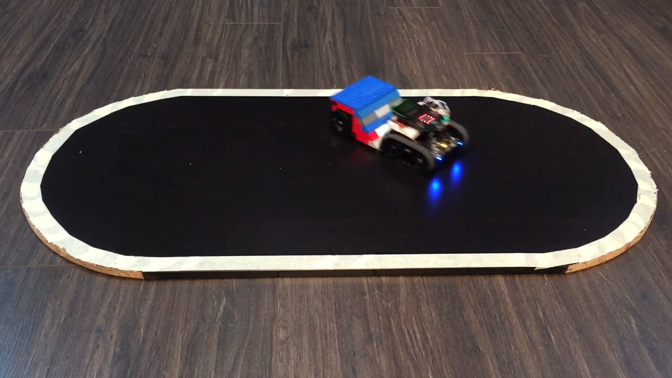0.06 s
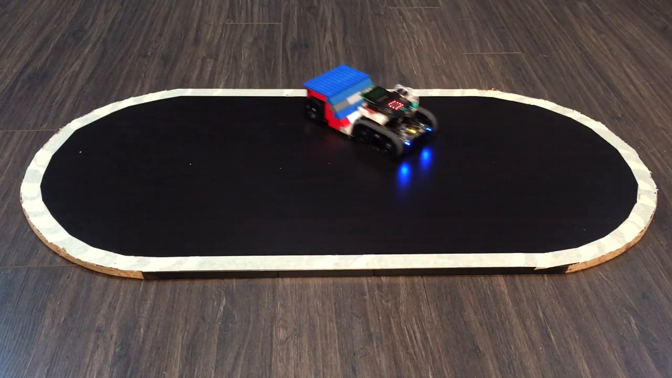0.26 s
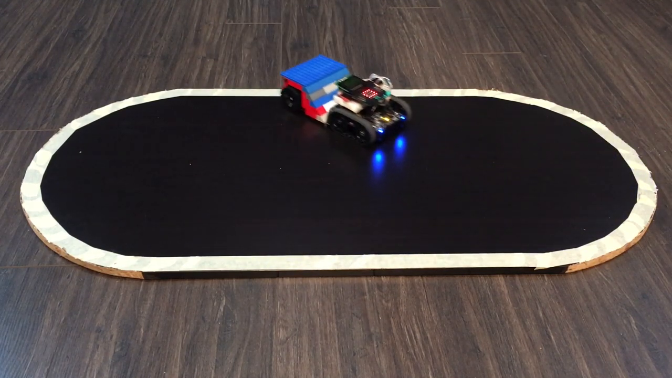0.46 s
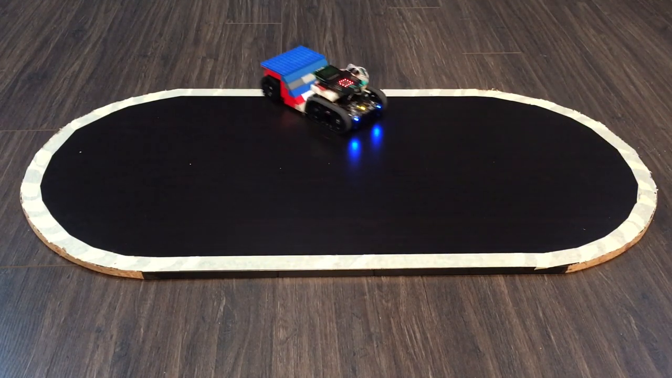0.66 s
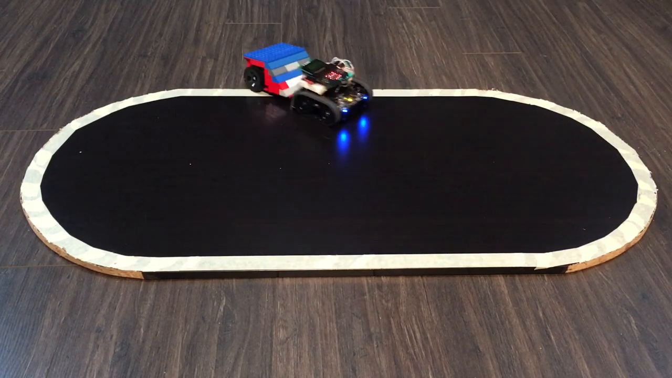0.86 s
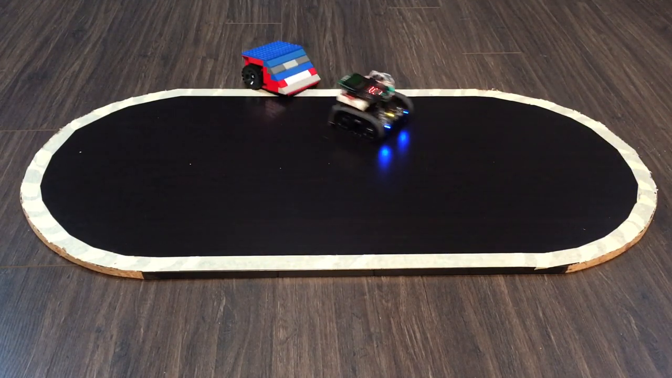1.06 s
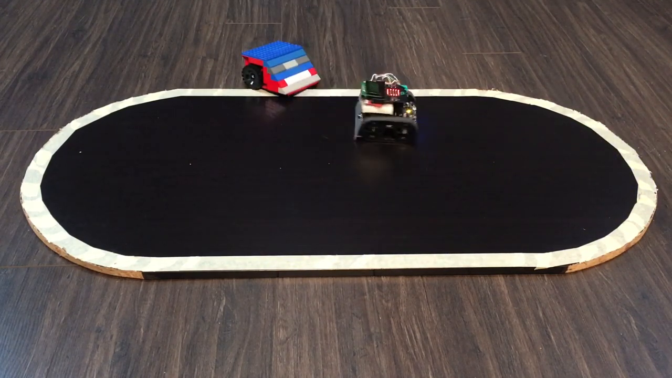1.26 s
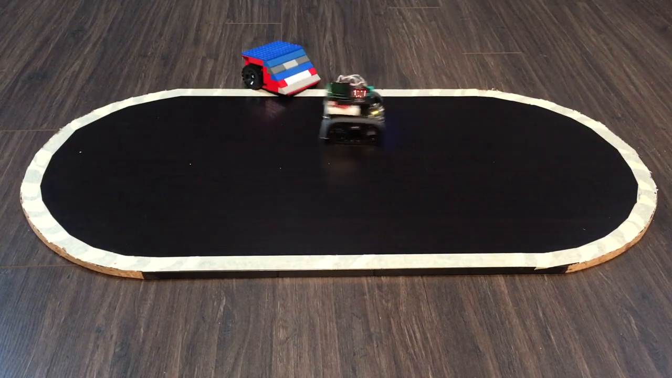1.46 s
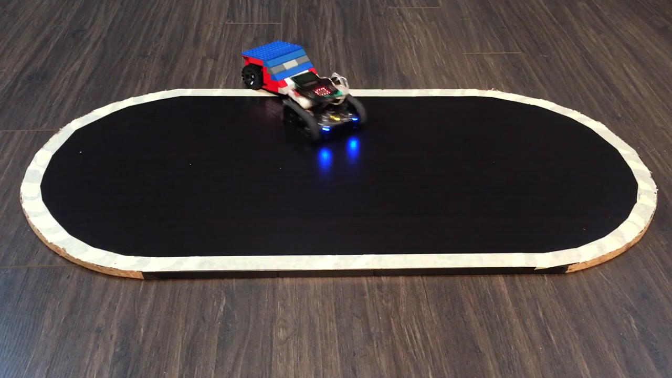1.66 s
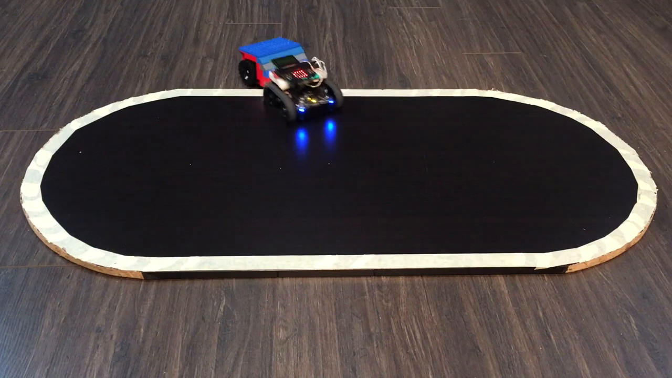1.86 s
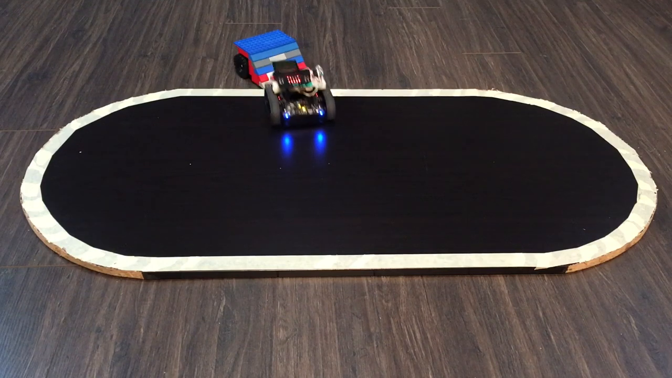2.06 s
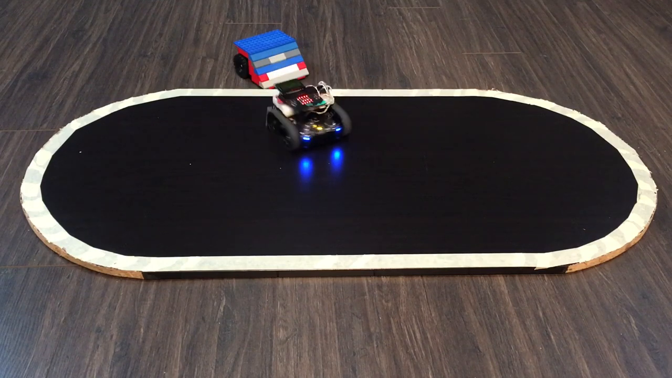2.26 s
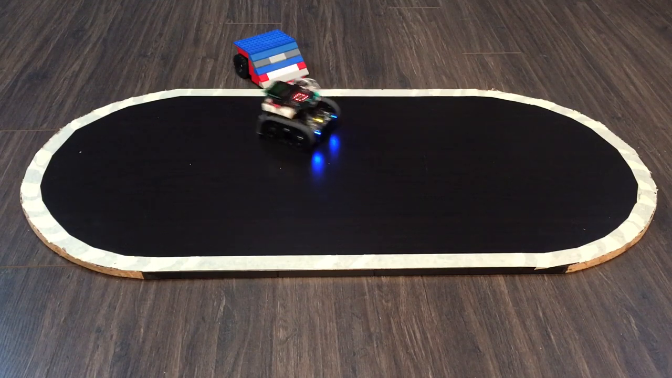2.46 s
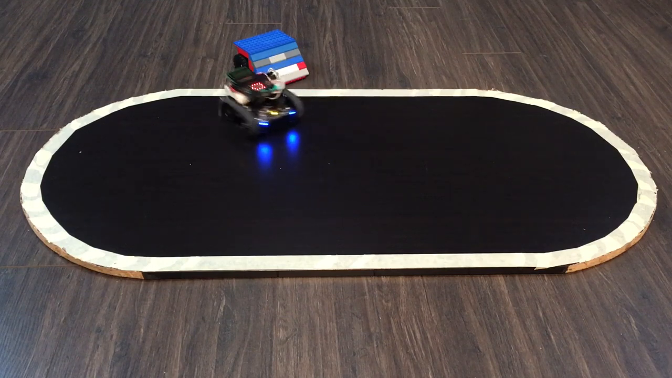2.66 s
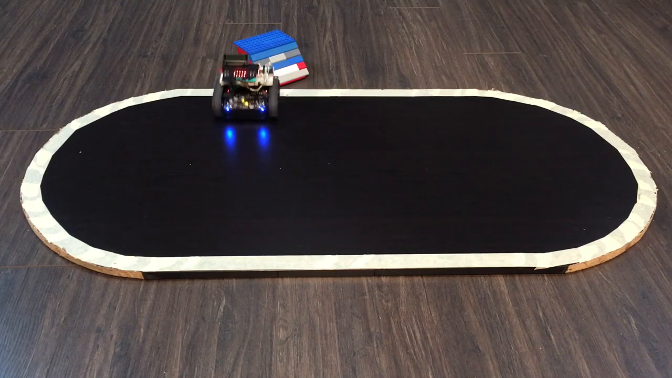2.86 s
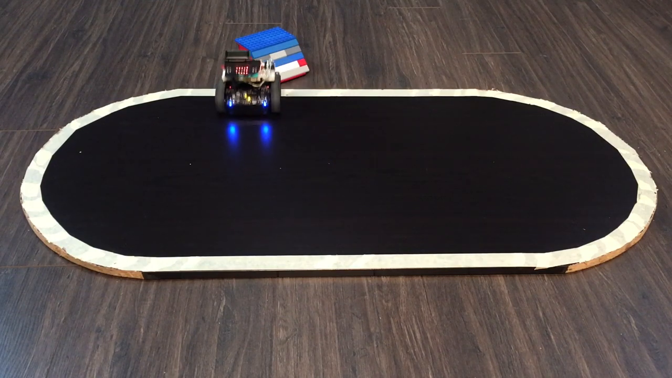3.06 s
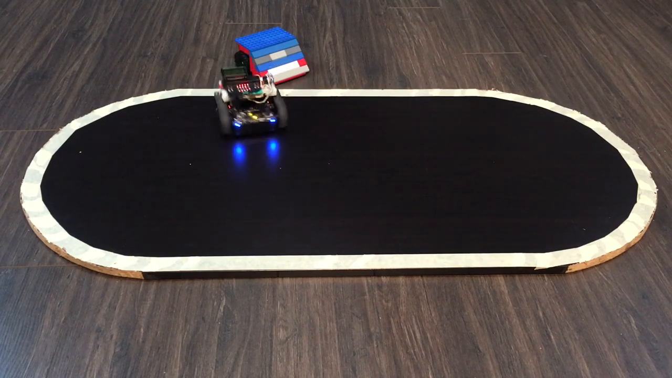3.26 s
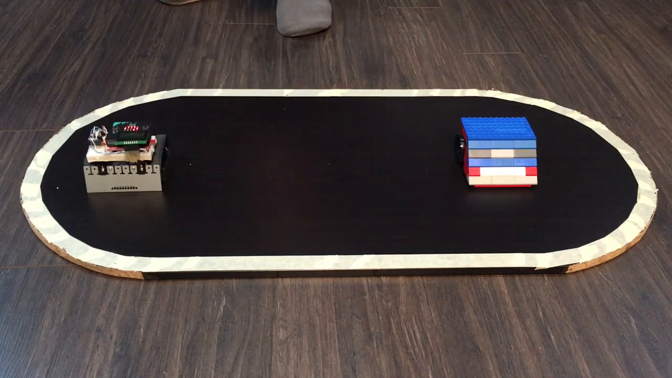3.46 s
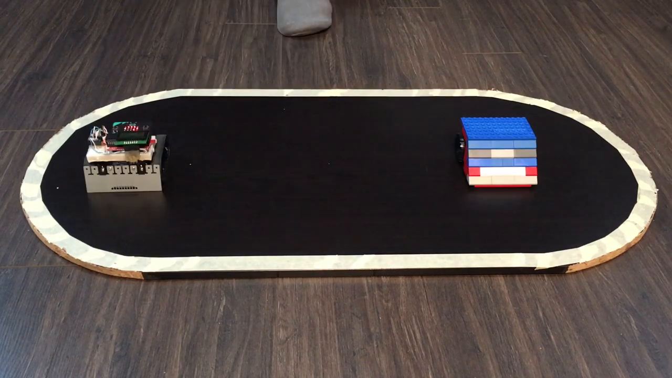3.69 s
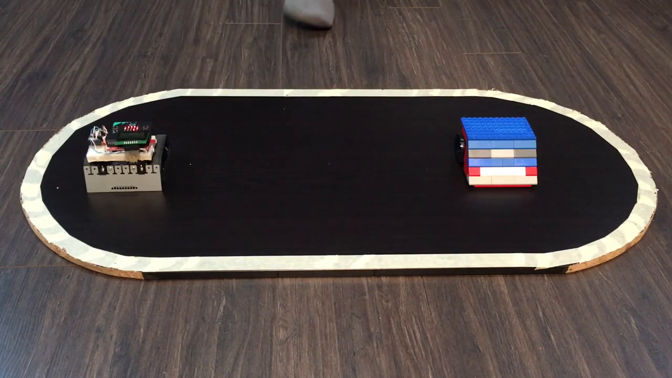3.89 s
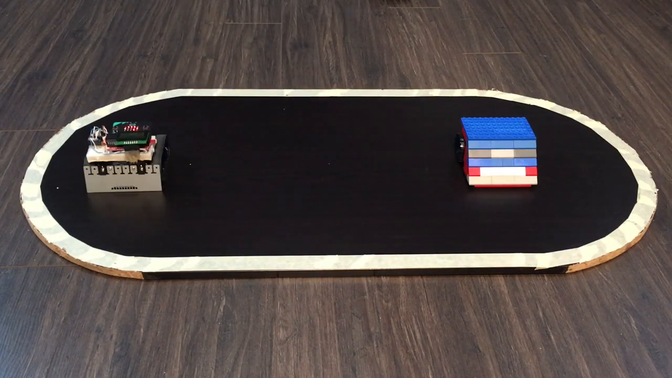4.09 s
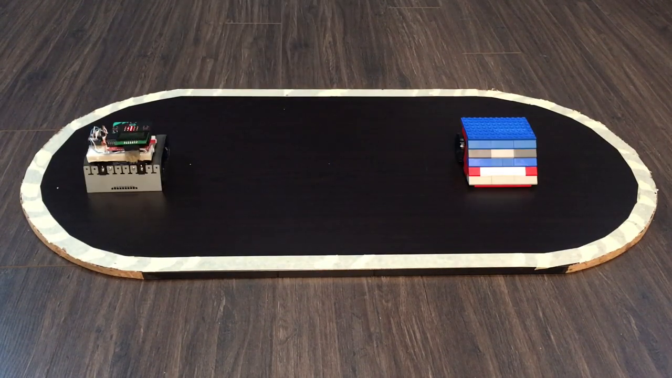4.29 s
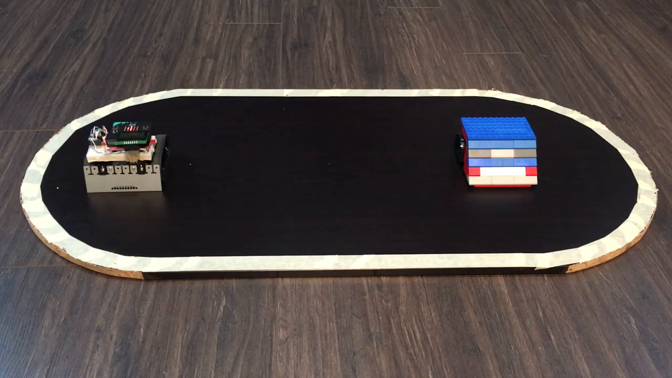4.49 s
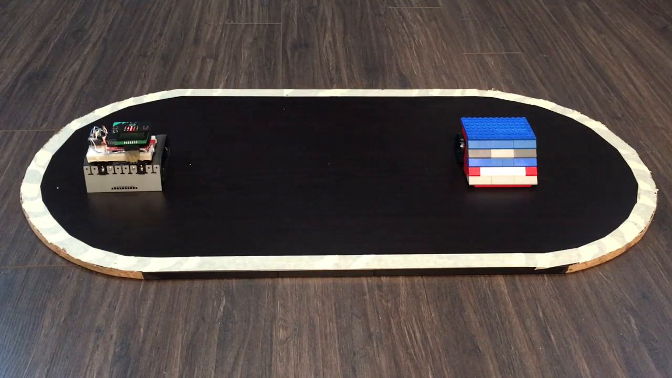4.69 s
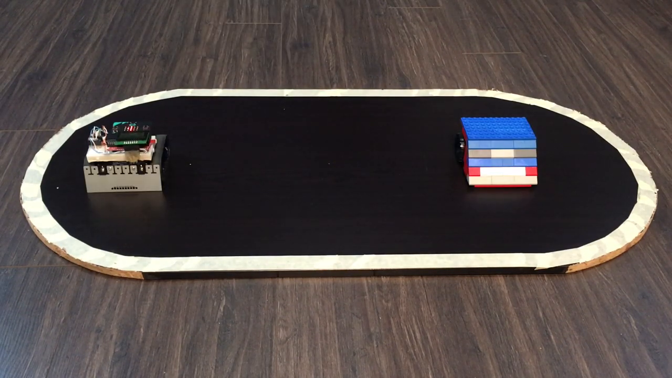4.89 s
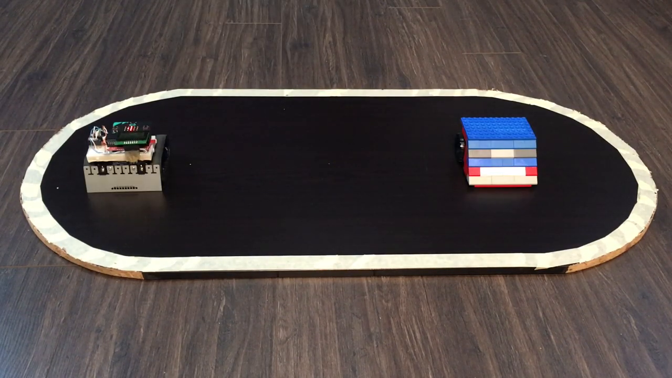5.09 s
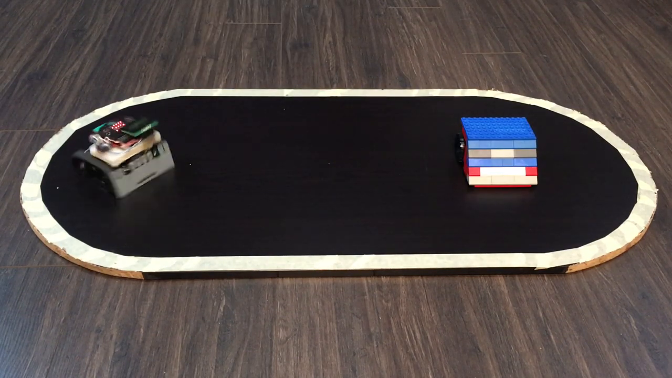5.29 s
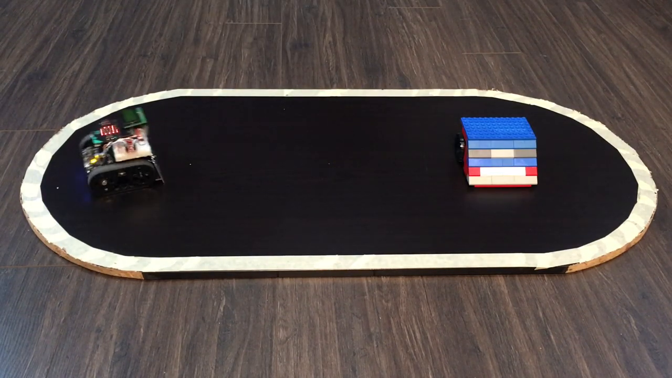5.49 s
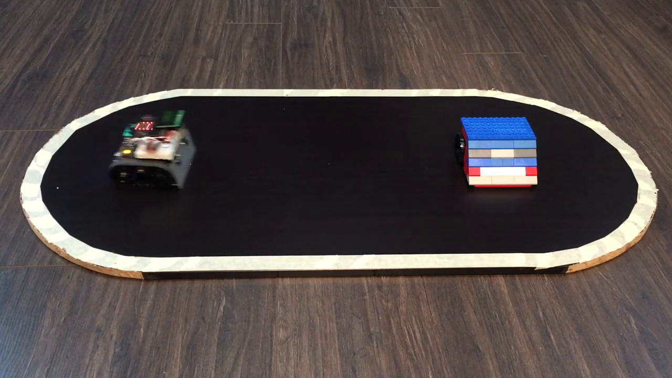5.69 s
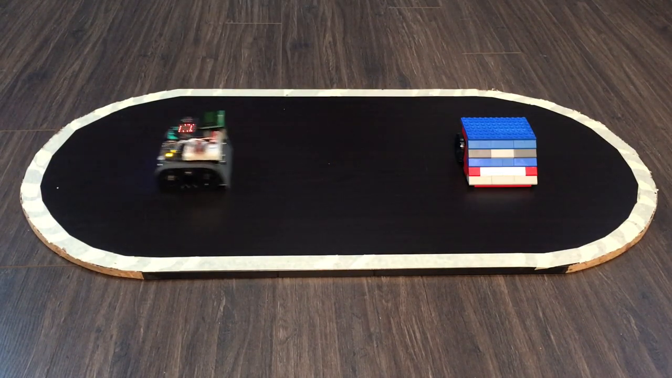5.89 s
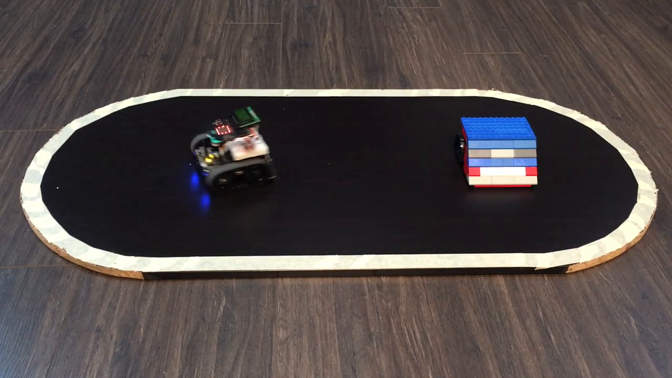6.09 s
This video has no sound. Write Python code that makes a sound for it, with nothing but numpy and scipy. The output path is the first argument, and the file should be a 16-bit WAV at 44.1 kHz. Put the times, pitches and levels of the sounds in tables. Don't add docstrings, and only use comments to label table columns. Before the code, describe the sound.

Raspy toy-motor whirring with dull thuds and sharp plastic clacks cuts abruptly to faint sock scuffs in a quiet room before the motors restart.

```python
import sys
import numpy as np
from scipy import signal
from scipy.fft import rfft, irfft, next_fast_len
from scipy.io import wavfile
from scipy.ndimage import uniform_filter1d

SR = 44100
rng = np.random.default_rng(int(sys.argv[2]) if len(sys.argv) > 2 else 0)


def elevation(decibels):
    levels = np.asarray(decibels, float)
    return 10 ** (levels / 20)


def to_wav(s):
    ch = np.atleast_2d(s).T
    pcm = np.round(np.clip(ch, -1, 1) * 32767)
    wavfile.write(sys.argv[1], SR, pcm.astype(np.int16))


N = 270774
T = np.arange(N) / SR
CHANGE_S = 3.331


def unit(x):
    return x / np.sqrt(np.mean(x ** 2))


def walk(rate_hz):
    hold = int(SR / rate_hz)
    steps = np.repeat(rng.standard_normal(N // hold + 1), hold)
    return unit(uniform_filter1d(uniform_filter1d(steps, hold), hold)[:N])


def colour(x, points):
    hz, db = np.transpose(points)
    size = next_fast_len(N, True)
    bins = np.log(np.fft.rfftfreq(size, 1 / SR) + 1)
    skirt = np.maximum(np.log(hz[0]) - bins, 0) + np.maximum(bins - np.log(hz[-1]), 0)
    gain = elevation(np.interp(bins, np.log(hz), db) - 60 * skirt)
    return unit(irfft(rfft(x, size) * gain, size)[:N])


def patchy(x, depth_db):
    z = signal.stft(x, nperseg=512)[2]
    field = uniform_filter1d(rng.standard_normal(z.shape), size=4, axis=0)
    field = uniform_filter1d(field, size=9, axis=1)
    return unit(signal.istft(z * elevation(depth_db * unit(field)), nperseg=512)[1][:N])


def resonate(x, peaks):
    return sum(elevation(db) * signal.lfilter(*signal.iirpeak(hz, hz / width, SR), x) for hz, width, db in peaks)


def grit(rate_hz, scatter_db):
    hits = rng.random(N) < rate_hz / SR
    return unit(hits * rng.standard_normal(N) * elevation(scatter_db * rng.standard_normal(N)))


def swells(rows):
    power = 0
    for s, db, rise_s, fall_s in rows:
        power = power + elevation(db - 20 * np.maximum((s - T) / rise_s, (T - s) / fall_s)) ** 2
    return np.sqrt(power)


def obey(orders):
    s, goal_hz, lag_s, *levels = np.transpose(orders)
    start_hz = [goal_hz[0]]
    for k in range(len(s) - 1):
        left = np.exp(-(s[k + 1] - s[k]) / lag_s[k])
        start_hz.append(goal_hz[k] + (start_hz[k] - goal_hz[k]) * left)
    now = np.maximum(np.searchsorted(s, T, "right") - 1, 0)
    hz = goal_hz[now] + (np.array(start_hz) - goal_hz)[now] * np.exp(-(T - s[now]) / lag_s[now])
    keep = np.exp(-1 / (0.007 * SR))
    settled = []
    for db in levels:
        change = signal.lfilter([1 - keep], [1, -keep], elevation(db[now]) - elevation(db[0]))
        settled.append(20 * np.log10(elevation(db[0]) + change + 1e-9))
    return hz, *settled


# multiple, level_db
OVERTONES = [(2, 1.5), (3, 3.5), (4, 2.5), (5, -2.5), (6, -11)]
# pitch_hz, width_hz, level_db
FRAME_MODES = [(2120, 130, -20), (2350, 240, -7), (2650, 200, -3.5), (3050, 116, -5.5), (3420, 180, -1.5),
               (3700, 220, -0.5), (3880, 210, -15.5), (4190, 220, 4.5)]


def whine(orders):
    waver, slip, throb_db = .003, .009, 3.7
    hz, first_db, upper_db = obey(orders)
    throb = walk(300) + 0.26 * walk(35)
    overtones, mesh = 0, 0
    # level_db, drift
    for share_db, drift in (0, 0), (-9, .014):
        speed_hz = hz * (1 + drift * walk(8) + waver * walk(60) + slip * walk(700))
        phase = 2 * np.pi * np.cumsum(speed_hz) / SR
        skirt = .35 * walk(1200) + elevation(-6.5) * walk(3500)
        force = elevation(throb_db * walk(250)) + skirt
        mesh = mesh + elevation(share_db + first_db) * force * np.sin(phase + .5 * walk(400))
        voice = 0
        for k, db in OVERTONES:
            k = round(k)
            case_db = np.maximum(1.4 * np.interp(k * hz, *np.transpose(HISS_COLOUR)), -4)
            level_db = upper_db + db + case_db + throb_db * np.roll(throb, k * SR // 7)
            voice += elevation(level_db) * np.sin(k * phase) * (k * hz < 15600)
        overtones = overtones + elevation(share_db) * voice
    return overtones + elevation(-9.5) * mesh + resonate(mesh, FRAME_MODES)


# start_s, mesh_hz, lag_s, first_partial_db, overtones_db
LEFT_PUSH = [(0, 2365, .05, -51, -55.5), (.12, 2445, .07, -49, -55.5), (.25, 2380, 0.028, -48.5, -54.5),
             (.316, 2130, 0.034, -52.5, -56.5), (.5, 2185, 0.049, -56, -55.5), (.6, 2020, 0.048, -57, -58),
             (.76, 2080, 0.038, -57, -59.5), (.835, 2610, 0.01, -88, -82), (.871, 3400, .1, -51, -66),
             (.911, 3880, .06, -53.5, -60), (.96, 3860, 0.055, -50.5, -66.5),
             (1.065, 1750, 0.024, -90, -70), (1.14, 2500, .13, -65, -62), (1.25, 2100, .02, -93, -80),
             (1.28, 3300, 0.081, -67, -56), (1.36, 2980, 0.027, -47, -57), (1.392, 4190, .047, -48.5, -54),
             (1.535, 2550, .12, -95, -93.5), (1.965, 4600, .17, -51, -64), (2.05, 4050, 0.073, -48, -59),
             (2.135, 1830, .03, -85, -80), (2.25, 15000, 2.7, -70, -78), (2.34, 6000, 0.53, -53, -59),
             (2.42, 6000, .5, -55, -52), (2.49, 3400, .025, -56, -62), (2.545, 4300, .035, -46.5, -56),
             (2.6, 4125, .02, -49.5, -53.5), (2.665, 4120, 0.041, -60, -70), (2.725, 2300, .3, -130, -130)]
# start_s, mesh_hz, lag_s, first_partial_db, overtones_db
LEFT_SPIN = [(5.172, 3960, .055, -56, -72), (5.215, 3993, .058, -42.5, -57.5),
             (5.43, 3736, 0.056, -59, -90), (5.462, 1950, .006, -110, -110),
             (5.483, 3285, 0.056, -61, -55.5), (5.551, 3026, .018, -58, -56), (5.636, 2690, .05, -90, -95),
             (5.8, 3180, .04, -62, -68), (5.88, 3180, .05, -64, -62), (5.925, 2850, .02, -90, -90),
             (6.0, 3390, .06, -56, -61), (6.035, 3185, .012, -46, -52.5), (6.06, 2920, .08, -53.5, -58),
             (6.11, 2374, 0.046, -60, -61)]
# start_s, mesh_hz, lag_s, first_partial_db, overtones_db
RIGHT = [(0, 2080, .05, -100, -100), (.64, 2150, 0.026, -58, -66), (.72, 2400, .1, -100, -100),
         (1.04, 2720, 0.022, -54.5, -77.5), (1.165, 2510, .035, -51.5, -66),
         (1.26, 2720, 0.039, -51.5, -65), (1.365, 2360, .015, -56, -73), (1.43, 4200, .02, -100, -100),
         (1.535, 2890, 0.074, -49.5, -62), (1.6, 3114, .02, -53, -55), (1.66, 2980, 0.035, -50.5, -53),
         (1.705, 3996, 0.12, -51, -55), (1.79, 2900, 0.14, -91.5, -90), (2.185, 2100, 0.16, -52, -62),
         (2.235, 2107, 0.16, -51, -65), (2.355, 2610, 0.043, -49.5, -64), (2.46, 3500, .096, -89.5, -92),
         (2.675, 2985, 0.031, -52.5, -56), (2.735, 3050, 0.042, -50, -57), (2.89, 3300, 0.067, -51, -52),
         (2.93, 2960, 0.079, -89, -73), (3.212, 2610, 0.029, -56.5, -69), (3.325, 3120, 0.22, -130, -130),
         (5.625, 2370, 0.021, -63, -61), (5.685, 2663, .04, -50.5, -59.5), (5.74, 2664, 0.041, -55, -57.5),
         (5.85, 2500, 0.0543, -63, -75), (5.89, 2660, .03, -55, -57.5), (6.03, 2580, 0.043, -70, -74)]


def motors():
    return whine(LEFT_PUSH + LEFT_SPIN) + whine(RIGHT)


# start_s, hiss_level_db
EFFORT = [
    [(0, -43.5), (.8, -44), (1.04, -42), (1.13, -46), (1.37, -40.5), (1.78, -41), (1.81, -39),
     (2.12, -44.5), (2.2, -47), (2.4, -42), (2.66, -41), (2.9, -42.5), (3.21, -44.5), (3.318, -50.5)],
    [(5.175, -49.5), (5.23, -42), (5.55, -43.5), (6.14, -45.5)],
]
# start_s, hiss_lost_db, braking_s
REVERSALS = [(.84, 11, 0.017), (1.11, 9, 0.063), (1.93, 6.5, 0.02), (2.02, -0.5, 0.049), (2.18, 5, 0.045),
             (2.679, 5, .022), (2.95, 4, .03), (2.37, 5, 0.027), (3.2, 10, 0.044), (5.461, 6, 0.054),
             (5.865, 6, 0.02), (6.054, 3, 0.059)]


def drive_effort():
    s, level_db = np.transpose(np.vstack(EFFORT))
    effort_db = np.interp(T, s, level_db)
    gate = 0
    for rows in EFFORT:
        inside_s = np.minimum(T - rows[0][0], rows[-1][0] - T)
        gate = gate + np.clip(inside_s / 0.011 + 1, 0, 1)
    for s, lost_db, brake_s in REVERSALS:
        away = np.maximum((s - T) / brake_s, (T - s) / 0.014)
        effort_db = effort_db - lost_db * np.clip(2 - 2 * away, 0, 1)
    return effort_db, np.minimum(gate, 1)


# pitch_hz, level_db per Hz
HISS_COLOUR = [(2530, -26), (4300, -2), (4880, -11), (6050, -0.5), (7660, -1.5), (9390, 0.5), (10000, 1.5),
               (10400, -4.5), (11000, 4), (12200, 2.5), (15500, -1), (16200, -19)]


def gear_hiss(effort_db):
    teeth = .6 * grit(9000, 1.5)
    return patchy(colour(rng.standard_normal(N) + teeth, HISS_COLOUR), 2.7) * elevation(effort_db - 4.0)


# pitch_hz, level_db per Hz
RATTLE_COLOUR = [(530, -52.5), (900, -8), (1180, -11), (1420, -6), (1530, -4.5), (2480, -1.5), (3160, -4.5),
                 (3760, 3), (4300, -3), (4830, -8), (5200, -4.5), (6760, -4.5), (11400, -120)]
# peak_s, level_db, rise_s, fall_s
JOLTS = [(.88, -62, .05, .5), (1.044, -49, 0.52, 0.15), (1.378, -57, 0.029, 0.81), (1.8, -52, 0.12, .2),
         (1.93, -69, 0.042, .15), (2.03, -61, 0.086, 0.27), (2.118, -45.5, 0.19, 0.11),
         (2.65, -52, 0.5, 0.09), (2.9, -54, 0.08, 0.59), (3.068, -41, 0.045, 0.073), (3.13, -55, 0.29, .1),
         (5.21, -58.5, 0.029, 0.39), (5.39, -56, 0.17, 0.18), (5.88, -55.5, .2, 0.54)]


def chassis_rattle(effort_db):
    at_rest = elevation(-61 + 0.2 * (effort_db - effort_db[0]))
    parts = .6 * grit(4000, 1.5)
    rattle = patchy(colour(rng.standard_normal(N) + parts, RATTLE_COLOUR), 2.77)
    return rattle * np.hypot(at_rest, swells(JOLTS)) * elevation(4.5)


# pitch_hz, level_db per Hz
SLIDE_COLOUR = [(59, -45), (100, -14.5), (130, -8), (172, -16), (221, -4.5), (290, -0.5), (350, 5),
                (387, -1), (508, -8), (573, -15), (646, -13), (1100, -26), (1430, -19), (2420, -120)]
# peak_s, level_db, rise_s, fall_s
DRAGS = [(0, -45.5, .1, 1.1), (.1, -49, 0.59, 0.42), (.25, -49, .5, 0.42), (.42, -52.5, 0.44, 0.52),
         (.548, -44.5, 0.14, 0.2), (.922, -41, 0.19, 0.16), (1.87, -57, 0.16, 0.26),
         (2.02, -31.5, 0.089, 0.13), (3.1, -54, 0.29, 0.17)]


def board_rumble():
    dragged = np.hypot(elevation(-67.5), swells(DRAGS))
    return colour(grit(2500, 2.0), SLIDE_COLOUR) * dragged * elevation(1.5 + 0.82 * walk(25))


# start_s, end_s, pitch_hz, level_db
PANELS = [(0.01, 0.149, 1950, -55.5), (0.776, 0.853, 10900, -52), (5.638, 5.762, 12400, -51),
          (5.88, 5.93, 9600, -51), (1.31, 1.55, 1400, -68), (1.446, 1.761, 464, -58),
          (2.457, 2.546, 3720, -46), (2.554, 2.897, 1418, -67.5), (2.567, 2.765, 469, -64.5),
          (3.212, 3.33, 11030, -51.5), (3.212, 3.33, 13700, -51), (3.25, 3.324, 12600, -58),
          (3.212, 3.3, 14600, -56), (3.354, 3.417, 8500, -76), (3.36, 3.41, 9700, -80),
          (3.16, 3.21, 11600, -58), (3.353, 3.478, 950, -63), (3.336, 3.475, 2190, -66),
          (3.34, 3.444, 2650, -70), (5.237, 5.464, 1415, -59.5), (5.849, 5.899, 1420, -49.5),
          (5.883, 5.999, 1440, -58.5), (0, 0.161, 1640, -60.5), (.32, 0.373, 1980, -50),
          (0.565, 0.614, 2025, -51.5), (.9, 1.007, 2280, -52), (1.047, 1.449, 2350, -56.5),
          (1.18, 1.407, 3600, -61), (1.558, 1.656, 4000, -59), (1.704, 1.792, 3650, -51.5),
          (2.46, 2.564, 3300, -50), (2.465, 2.558, 2310, -53), (2.721, 2.898, 2120, -64),
          (3.07, 3.15, 2170, -46), (3.08, 3.198, 2530, -55), (3.1, 3.183, 3450, -51),
          (3.22, 3.321, 3800, -58), (5.19, 5.442, 2650, -70), (5.468, 5.623, 4010, -71),
          (5.7, 5.848, 1450, -71), (5.78, 6.019, 3800, -63), (5.989, 6.139, 1440, -69)]


def panels():
    out = np.zeros(N)
    for start, end, hz, db in PANELS:
        span = slice(int(start * SR), min(int(end * SR), N))
        swell = np.sin(np.pi * np.clip((T[span] - start) / (end - start), 0, 1)) ** .5
        ringing = unit(resonate(rng.standard_normal(SR), [(hz, hz / 40, 0)]))
        out[span] += elevation(db) * swell * ringing[-len(swell):]
    return out


def drive():
    effort_db, gate = drive_effort()
    return gate * (gear_hiss(effort_db) + chassis_rattle(effort_db) + board_rumble()) + panels()


# pitch_hz, level_db per Hz
AIR_COLOUR = [(12, -54.5), (30, -31.5), (45, -13), (68, -13), (96, -14), (123, -9.5), (168, -10.5),
              (301, -10), (558, -15), (678, -14.5), (849, -17.5), (2820, -32.5), (11800, -42.5),
              (16000, -43.5)]


def room_air():
    swell_db = .6 * walk(3)
    return colour(rng.standard_normal(N), AIR_COLOUR) * elevation(-62 + swell_db)


# pitch_hz, level_db
HUM = [(60, -75), (120.5, -62.5)]


def mains_hum():
    hum = 0
    for hz, db in HUM:
        level = np.sqrt(2) * elevation(db + 2.3 * walk(5.4))
        hum = hum + level * np.sin(2 * np.pi * hz * T + 0.59 * walk(5.4))
    return hum


def strike(events, bodies, edge_hz, push_s, edge_s, loose):
    edge = signal.butter(2, edge_hz, "band", fs=SR, output="sos")
    out, t = np.zeros(N + SR), np.arange(SR // 3) / SR
    push = np.sin(np.pi * np.minimum(t / push_s, 1))
    for (s, db, ring_s, edge_db, *_), body in zip(events, bodies):
        noise = rng.standard_normal((2, len(t)))
        chatter = elevation(-60 * t / max(ring_s, .005))
        low = resonate(push + loose * noise[0] * chatter, body)
        high = signal.sosfilt(edge, noise[1]) * (np.exp(-t / edge_s) + 0.12 * chatter)
        at = int(s * SR)
        out[at:at + len(t)] += elevation(db) * (low / abs(low).max() + elevation(edge_db) * high / abs(high).max())
    return out[:N]


# pitch_hz, width_hz, level_db
BOARD_MODES = [(69.2, 37, -16), (142, 43, -1), (229, 16, 3), (302, 23, -4.5), (356, 60, 2.5),
               (433.5, 13.5, 2), (497, 120, -5), (571, 63, -6.5), (631, 88, 1.5), (690, 50, -0.5),
               (860, 100, -12), (950, 330, -12)]
# start_s, peak_db, edge_db, low_modes_db, high_modes_db
THUDS = [(0.267, -39, 1, -35, -35), (0.316, -29, -6, -45, -58), (0.325, -35, -30, -26, -32),
         (0.358, -32, -7, -12, -40), (0.573, -25, -19, -10, -28), (0.599, -26.5, -31, -15, -38),
         (0.619, -33.5, -18, -15, -40), (0.856, -18.5, -11, -17.5, -12), (0.867, -26.5, -30, -19, -8),
         (0.876, -28, -30, -20, -16), (0.904, -25.5, -11, -7, -8), (0.929, -24.5, -6, -24, -22),
         (1.7957, -17.5, -0.5, -16, -10.5), (1.841, -20.5, -26, -42, -19), (1.853, -26, -30, -36, -13),
         (1.9538, -18.5, -20, -44, -2), (1.975, -24, -15, -29, -1), (2.004, -23, -6, -9, -10),
         (2.0229, -11, -18, -37, 6), (2.028, -17, -23, -40, -3), (2.035, -27, -25, -27, 0),
         (2.052, -23, -24, -19, -4), (2.066, -25, -25, -25, -4), (2.084, -23, -11, -19, 9),
         (2.947, -30, 1.5, -15, -8), (2.95, -31, -30, -26, -14), (2.976, -23, -25, -22, -6),
         (2.982, -26.5, -30, -24, -12), (2.993, -25, -12, -21, -5), (3.012, -30, -30, -19, -8),
         (3.025, -33.5, -25, -27, -7), (3.066, -24, -5, 22, -24), (3.099, -50, 0, -8.5, -14),
         (5.855, -46, 12, -25, 4)]
# pitch_hz, width_hz, level_db
CAVITY = (467, 185, 0.61)


def thuds():
    boards, drops, last_s = [], [], 0
    for s, db, edge_db, low_db, high_db in THUDS:
        tilt_db = [low_db + 16.0, 0, high_db + 0.5]
        boards.append([(hz, w, mode_db + np.interp(hz, [140, 330, 600], tilt_db))
                       for hz, w, mode_db in BOARD_MODES])
        ring_s = 0.23 if s - last_s > 0.17 else 0.13
        drops.append((s, db, ring_s, edge_db))
        last_s = s
    blows = strike(drops, boards, [1000, 3500], push_s=.0011, edge_s=0.0043, loose=0.63)
    return elevation(-3) * blows + resonate(blows, [CAVITY])


# pitch_hz, width_hz, level_db
SHELL_MODES = [(1440, 250, 7), (1950, 610, 8.5), (2330, 310, -1.5), (2650, 56, -3), (3630, 310, -0.5),
               (3800, 520, 7)]
# start_s, peak_db, ring_s,
# treble_db, best_rung_hz
CLACKS = [(0.8555, -51, 0.044, -22, 1300), (1.793, -12, 0.041, 1.5, 3700), (1.795, -13, 0.021, -12.5, 2100),
          (1.803, -27.5, .04, -15, 3800), (1.8449, -22, 0.036, -19, 2450), (2.0225, -19, 0.028, -28, 1370),
          (2.03, -30, 0.037, -28, 1440), (2.0523, -28, 0.037, -22, 1330), (2.9441, -32, 0.04, -7.5, 1362),
          (2.975, -24, 0.046, -21, 1700), (3.0488, -21, 0.047, -0.5, 2000), (3.0651, -9, 0.022, -5, 2820),
          (3.0705, -19.5, 0.022, -21, 2180), (3.0762, -23.5, 0.065, -25.5, 2300),
          (3.086, -25.5, 0.044, -24.5, 2300), (3.1184, -22, 0.044, -25, 1950), (3.343, -53, .03, -20, 1500),
          (3.5696, -43.5, 0.015, -2, 4280), (3.758, -45, 0.03, -18, 3762), (5.856, -44, 0.03, -11, 1418)]


def clacks():
    shells = []
    for *_, best_hz in CLACKS:
        shells.append([(hz, w, db - 32.0 * abs(np.log2(hz / best_hz))) for hz, w, db in SHELL_MODES])
    return strike(CLACKS, shells, [4500, 11000], push_s=0.00013, edge_s=0.00061, loose=0.18)


def knocks():
    no_bass = signal.butter(2, 110, "high", fs=SR, output="sos")
    return signal.sosfilt(no_bass, thuds() + clacks())


# start_s, end_s, from_hz, to_hz, level_db
CHIRPS = [
    (1.102, 1.153, 3050, 2730, -59),
    (1.199, 1.44, 1650, 1800, -66.5),
    (1.38, 1.454, 2310, 2600, -62),
    (1.662, 1.727, 2148, 2693, -57),
    (2.86, 2.912, 2450, 2760, -52.5),
    (5.885, 5.95, 2240, 2543, -59),
]


def chirps():
    out = np.zeros(N)
    shake = walk(220) + 1j * walk(220) + 0.95
    for start, end, from_hz, to_hz, db in CHIRPS:
        span = slice(int(start * SR), int(end * SR))
        along = (T[span] - start) / (end - start)
        phase = 2 * np.pi * np.cumsum(from_hz + (to_hz - from_hz) * along) / SR
        swell = np.sin(np.pi * np.clip(along, 0, 1)) ** .5
        out[span] += elevation(db) * swell * (shake[span] * np.exp(1j * phase)).imag
    return out


# pitch_hz, level_db per Hz
SOCK_COLOUR = [(530, -47), (900, -1.5), (1970, -1), (2890, -5), (4150, -6.5), (4800, -9), (12900, -12.5),
               (16000, -19)]
# peak_s, level_db, rise_s, fall_s
SCUFFS = [(3.36, -74.5, .03, 0.25), (3.49, -67, 0.047, 0.32), (3.555, -59.5, 0.074, 0.074),
          (3.6, -69.5, .05, 0.47), (3.76, -61, 0.0062, 0.15), (3.932, -66, 0.037, 0.12), (4.2, -79, .9, .9),
          (4.33, -62, 0.032, 0.15), (4.56, -69.5, 0.15, 0.11), (4.66, -63, 0.038, 0.094),
          (4.86, -72, .6, 0.11)]


def socks():
    cloth = colour(rng.standard_normal(N) + 0.52 * grit(2500, 2.9), SOCK_COLOUR)
    return (T > CHANGE_S) * swells(SCUFFS) * elevation(4.0 + 1.7 * walk(50)) * cloth


ROOM_T60_S = [0.41, 0.55, 0.29]
ROOM_DB = [-0.5, -2, -8]


def room(x):
    t = np.arange(SR) / SR
    bands_hz = [(60, 900), (900, 5000), (5000, 16000)]
    tail = 0
    for band, t60, db in zip(bands_hz, ROOM_T60_S, ROOM_DB):
        sos = signal.butter(2, band, "band", fs=SR, output="sos")
        part = signal.sosfilt(sos, rng.standard_normal(SR))
        part = part * elevation(-60 * t / t60) * np.clip(t / 0.0038 - .5, 0, 1)
        tail = tail + elevation(db) * part / np.sqrt(np.sum(part ** 2) * SR / 2 / (band[1] - band[0]))
    return signal.fftconvolve(x, tail[None], axes=1)[:, :N]


def scene():
    first = T < CHANGE_S
    gears = motors() + chirps()
    blows = knocks()
    to_walls = blows + elevation(-14) * gears
    before, after = room(np.array([to_walls * first, to_walls * ~first]))
    background = room_air() + mains_hum() + socks()
    return (gears + blows + before * first + after + drive() + background)[None]


def band_limit(x):
    return signal.sosfilt(signal.butter(12, 16960, fs=SR, output="sos"), x)


def record(dry):
    fade_out_s, fade_in_s = 0.047, 0.028
    fade = np.clip(np.maximum((CHANGE_S - T) / fade_out_s, (T - CHANGE_S) / fade_in_s), .03, 1)
    rounded = .3 * np.tanh(dry / .3)
    top = signal.ellip(6, .2, 22, 15750, fs=SR, output="sos")
    return band_limit(signal.sosfilt(top, rounded * fade))


dry = scene()
out = record(dry)
to_wav(out)
```